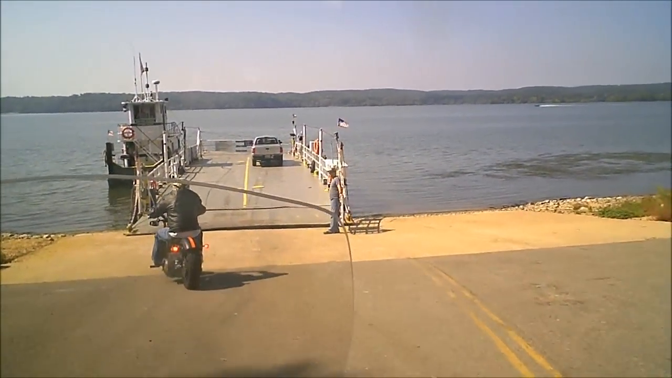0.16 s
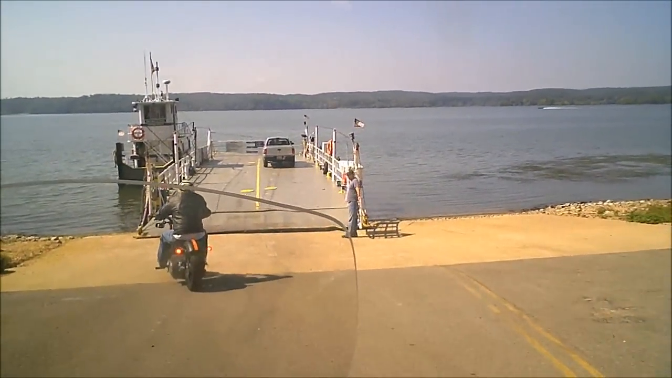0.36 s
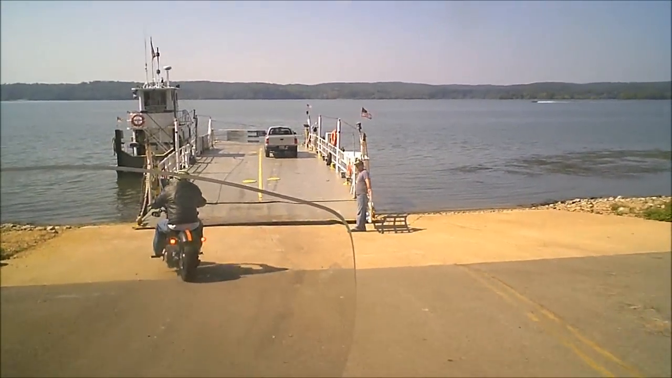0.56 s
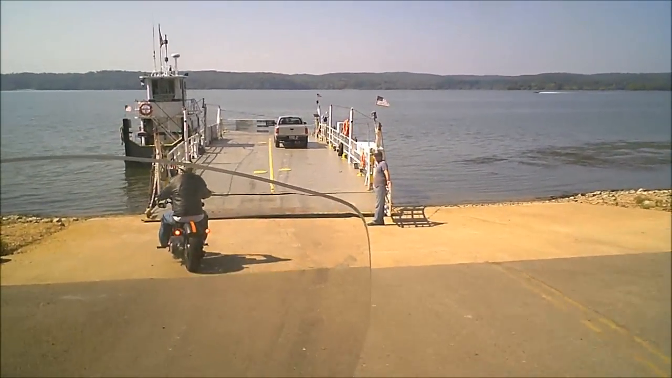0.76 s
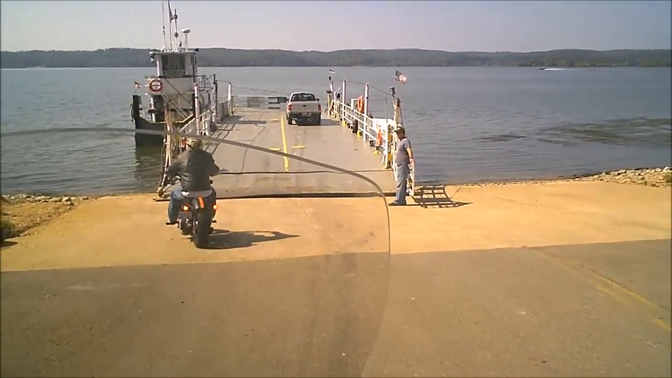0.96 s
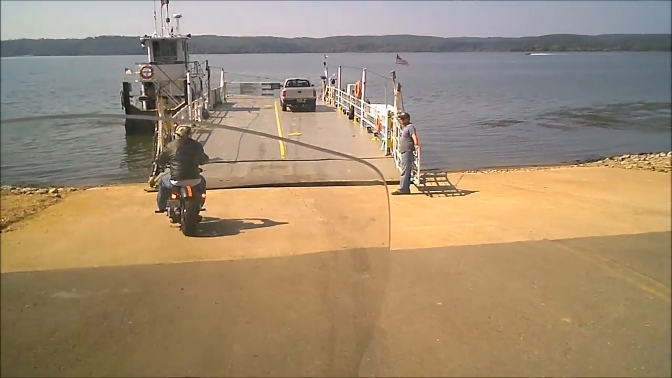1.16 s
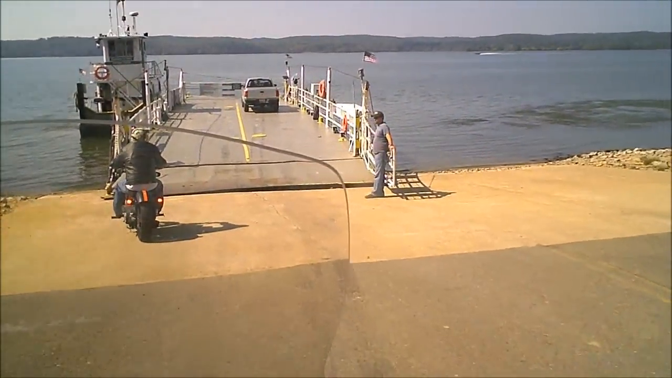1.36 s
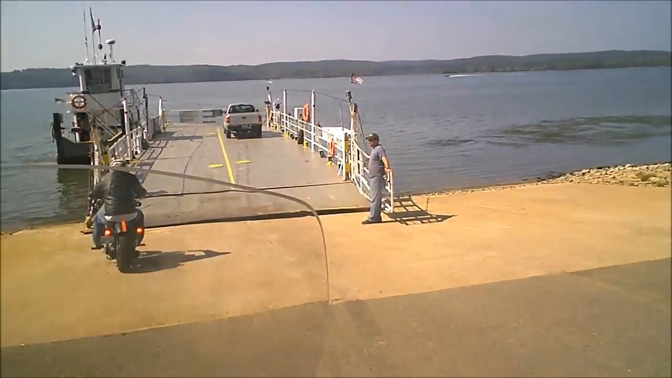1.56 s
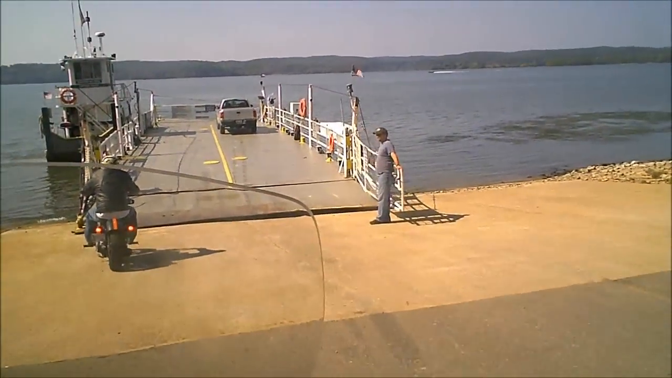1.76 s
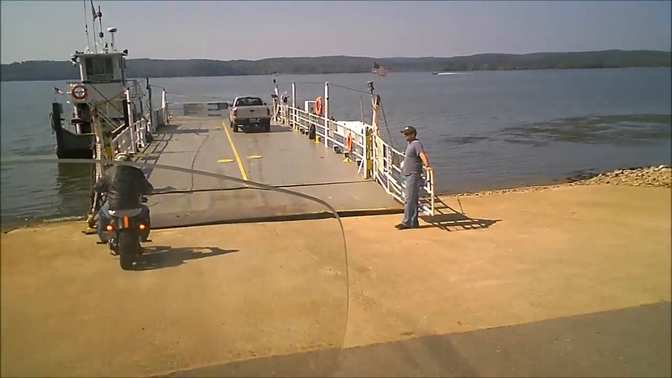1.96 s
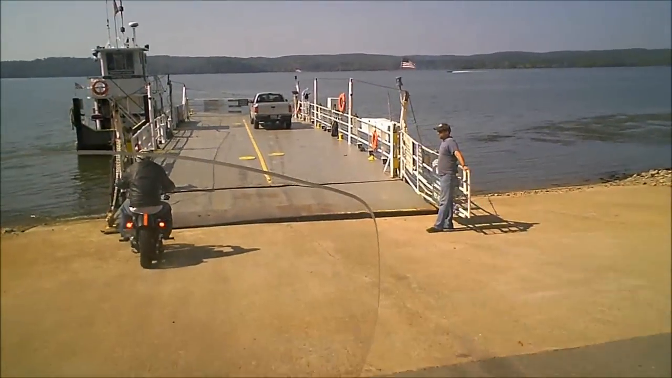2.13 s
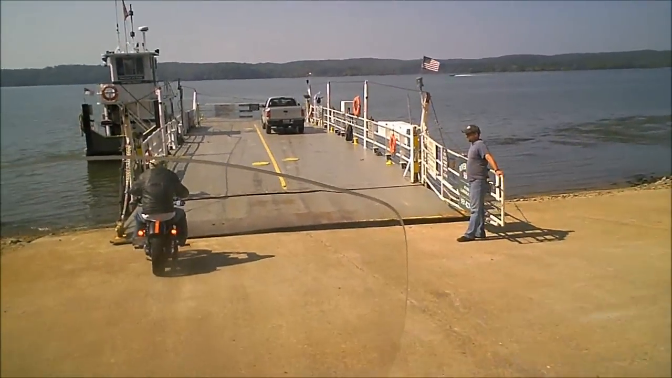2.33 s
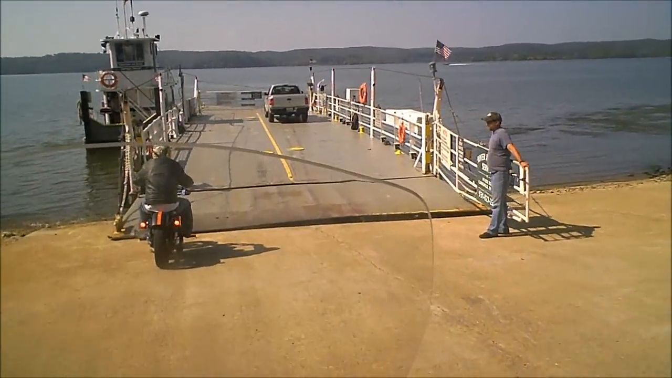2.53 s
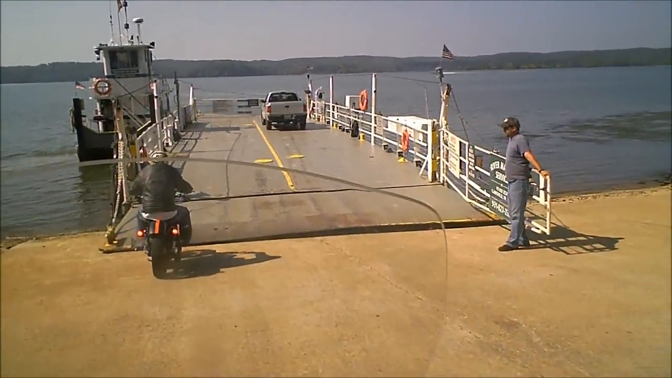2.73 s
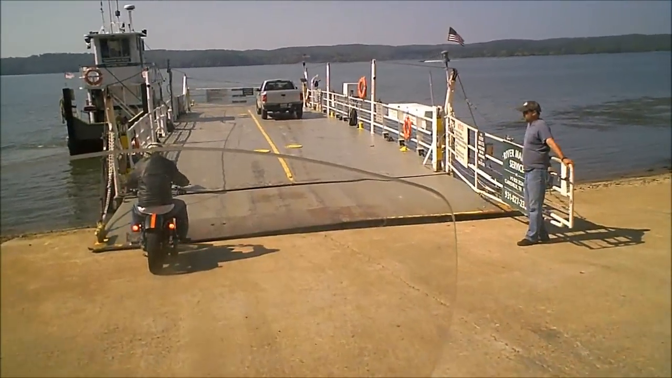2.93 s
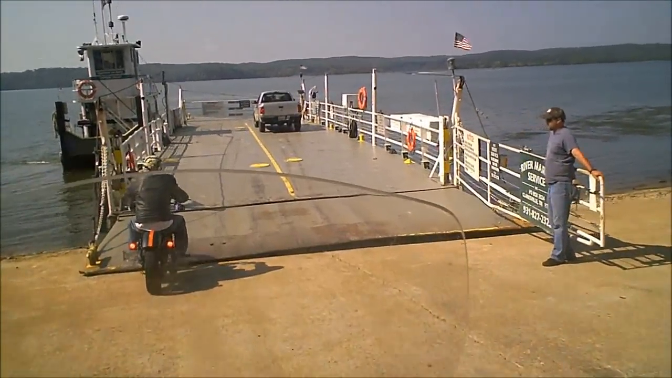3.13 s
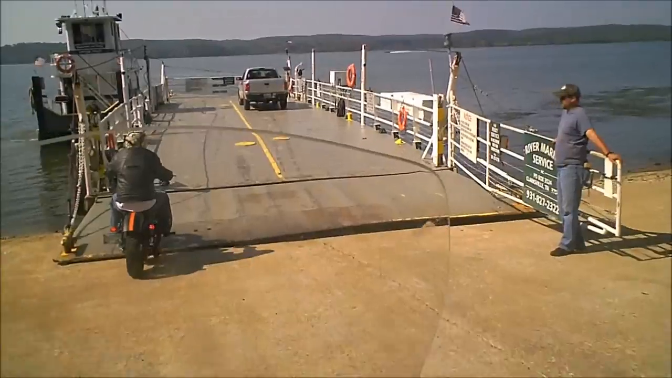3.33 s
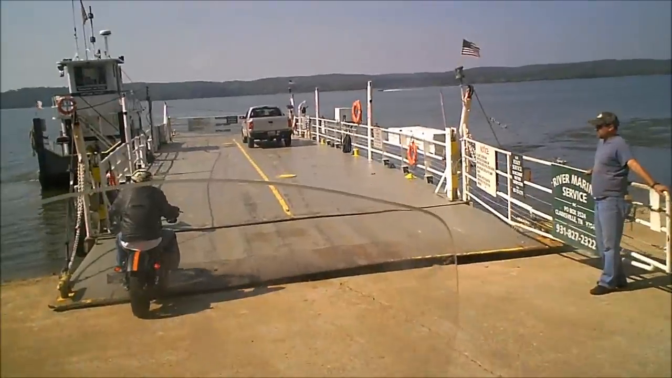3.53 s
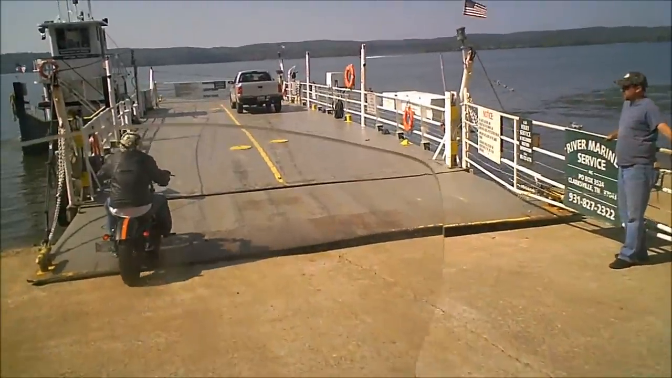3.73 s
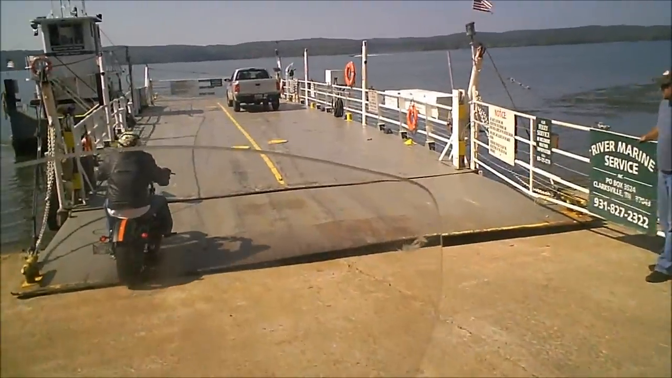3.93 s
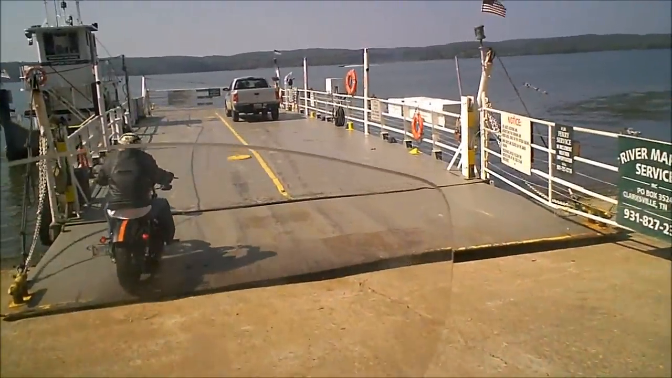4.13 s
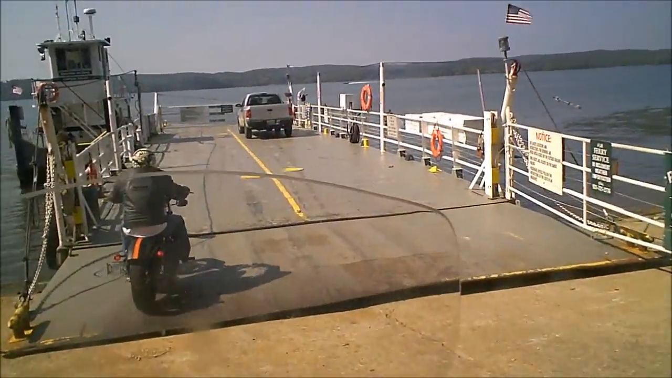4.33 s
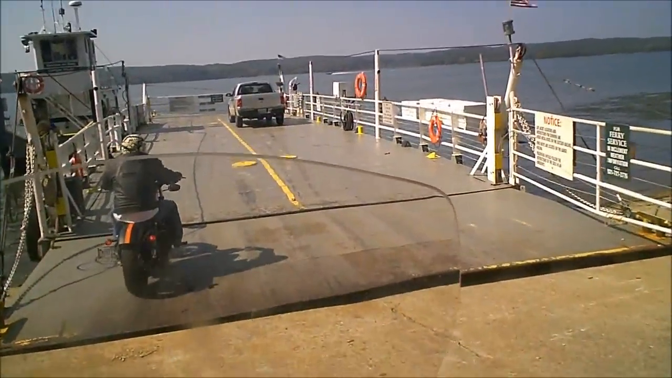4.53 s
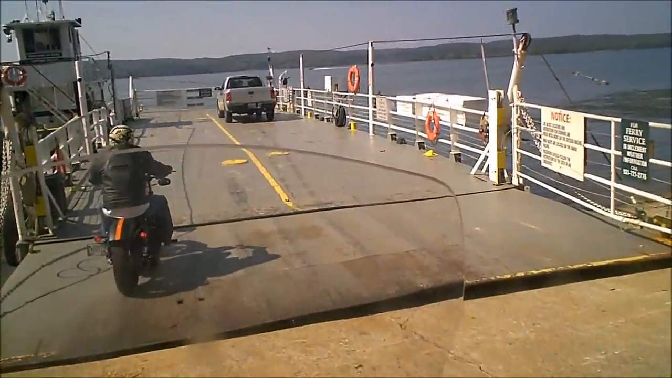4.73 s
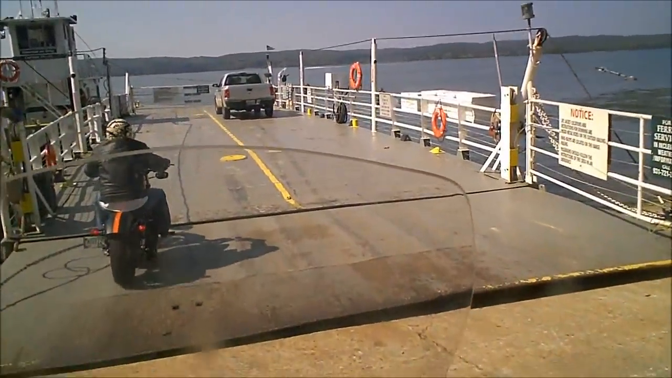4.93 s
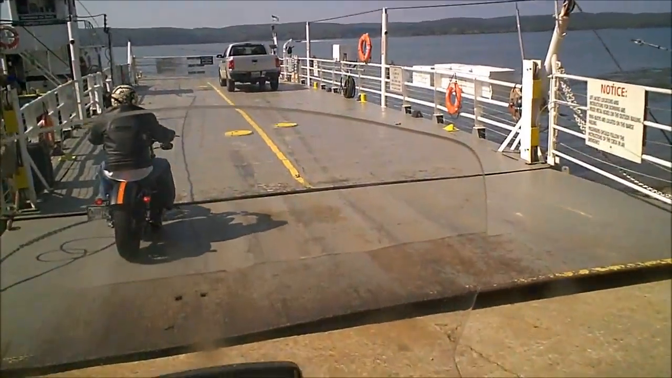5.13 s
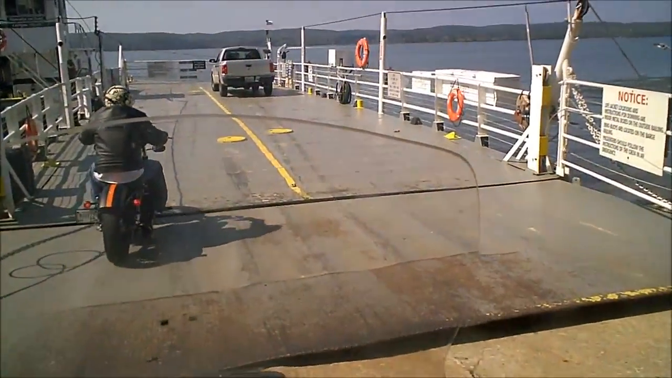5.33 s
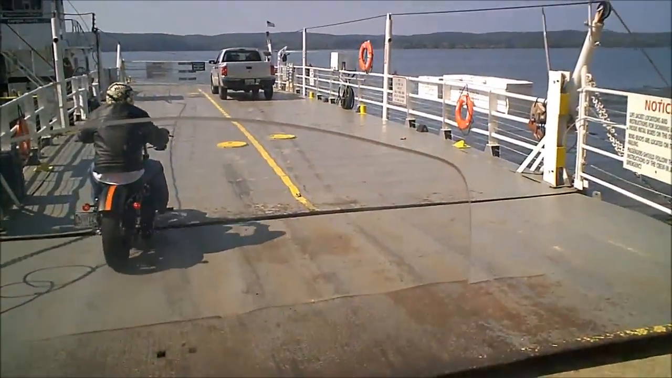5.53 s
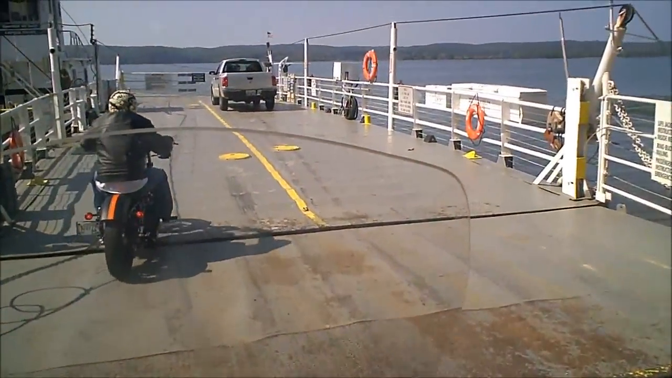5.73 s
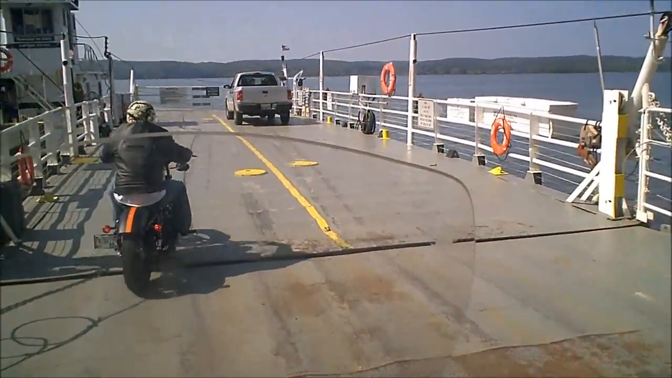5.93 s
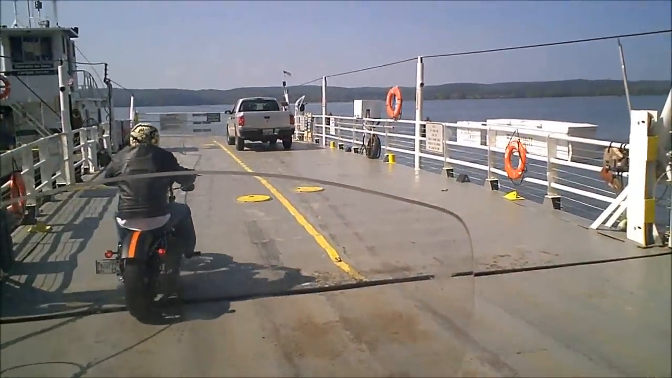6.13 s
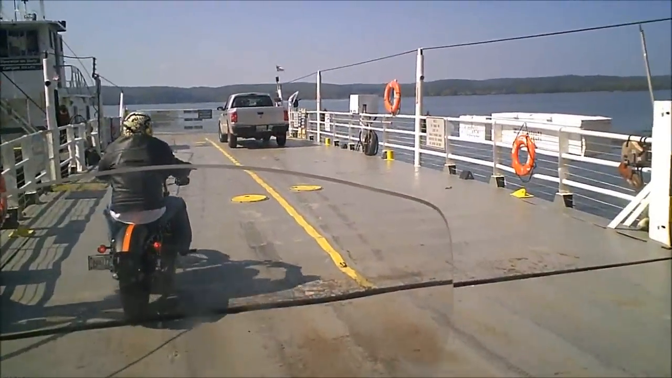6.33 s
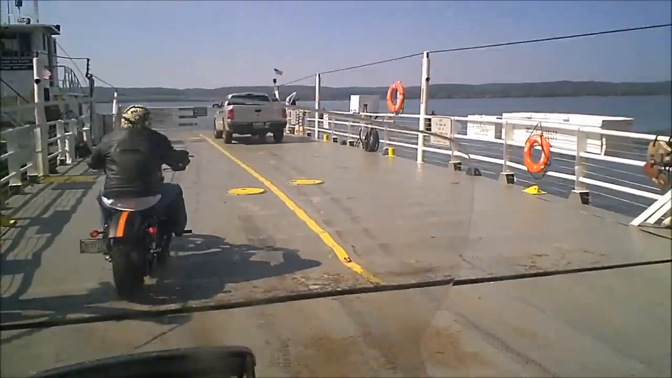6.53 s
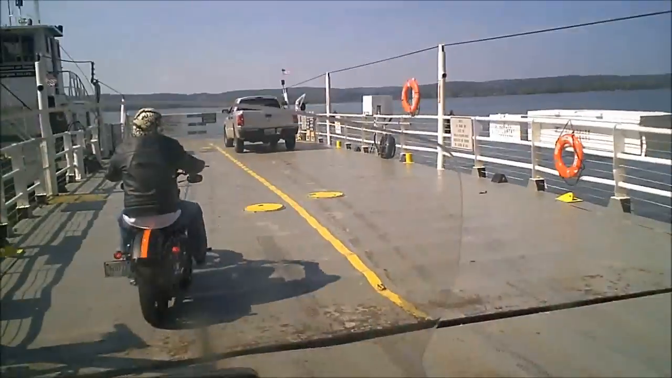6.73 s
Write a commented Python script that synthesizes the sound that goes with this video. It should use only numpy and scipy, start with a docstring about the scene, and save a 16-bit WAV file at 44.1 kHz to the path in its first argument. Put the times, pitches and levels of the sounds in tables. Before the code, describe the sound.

Two motorcycles rumble slowly onto a steel ferry deck, one barking with short throttle blips, with an engine clatter and a ramp clank.

```python
"""A V-twin motorcycle lopes along and barks at four touches of the throttle, louder as it speeds up.
Each firing rings the exhaust pipes; an open throttle adds a crack of shocks. It is heard from a second,
slower-running twin, whose valve gear clatters over a low drone. Both roll down a concrete landing onto
a steel ferry deck: tyres rush, the ramp clanks under the wheels, something ticks sharply near the end."""
import sys
import numpy as np
from scipy import signal
from scipy.fft import rfft, irfft, next_fast_len
from scipy.io import wavfile
from scipy.ndimage import uniform_filter1d, map_coordinates

SR = 44100
rng = np.random.default_rng(int(sys.argv[2]) if len(sys.argv) > 2 else 0)


def log_audio(samples):
    """Write samples as a 16-bit WAV file to the path given in sys.argv[1]."""
    # one column per channel
    frames = np.atleast_2d(samples).T
    # limit to full scale, then quantise
    limited = np.clip(frames, -1, 1)
    pcm = np.round(limited * 32767).astype(np.int16)
    wavfile.write(sys.argv[1], SR, pcm)


N = 298998


def amp(db):
    """Decibels to gain."""
    return 10 ** (np.asarray(db) / 20)


def unit(x):
    """Scale to rms 1."""
    return x / np.sqrt(np.mean(x ** 2) + 1e-20)


def curve(rows):
    """(time, value) rows to one value per sample."""
    return np.interp(np.arange(N) / SR, *np.transpose(rows))


def at(times_s, values):
    """Per-sample values read at these times."""
    return np.interp(times_s, np.arange(N) / SR, values)


def wobble(rate_hz):
    """Smooth random curve, rate_hz knots a second."""
    knots = rng.standard_normal(int(N * rate_hz / SR) + 4)
    return map_coordinates(knots, [np.arange(N) * rate_hz / SR])


def colour(spectrum, hz):
    """Gain of (frequency, level) rows joined on a log axis."""
    knots_hz, db = np.transpose(spectrum)
    return amp(np.interp(np.log(hz + 1), np.log(knots_hz + 1), db))


def filtered(x, response):
    """x through a frequency response."""
    size = next_fast_len(N + SR // 2)
    return irfft(rfft(x, size) * response(np.fft.rfftfreq(size, 1 / SR)), size)[:N]


def noise(spectrum):
    """Coloured noise, rms 1."""
    return unit(filtered(rng.standard_normal(N), lambda hz: colour(spectrum, hz)))


def pulse(spectrum, size=4096):
    """Minimum-phase pulse with this spectrum, peak 1."""
    cepstrum = irfft(np.log(colour(spectrum, np.fft.rfftfreq(size, 1 / SR))))
    cepstrum[1:size // 2] *= 2
    cepstrum[size // 2 + 1:] = 0
    shape = irfft(np.exp(rfft(cepstrum)))[:size // 2]
    return shape / np.abs(shape).max()


def strikes(times_s, gains):
    """Single-sample blows."""
    return np.bincount(np.clip(np.round(times_s * SR).astype(int), 0, N), gains, N + 1)[:N]


def through(x, response):
    """x convolved with an impulse response."""
    return signal.fftconvolve(x, response)[:N]


def shaft_times(speed, shares):
    """Times at which an engine passes these shares of its cycle."""
    cycles = np.cumsum(curve(speed)) / SR
    marks = (np.arange(int(cycles[-1]) + 1)[:, None] + np.array(shares)).ravel()
    return np.interp(marks[marks < cycles[-1]], cycles, np.arange(N) / SR)


# rolling noise (frequency [Hz], level [dB])
TYRE_SPECTRUM = [(25, -27), (55, -32), (105, 9), (145, 1.5), (300, -8), (560, 5), (740, -8), (950, -1.5),
                 (1200, -7.5), (2200, -27.5), (3500, -43), (5000, -44)]
def tyres(level_db=-49, follow=0.33, uneven_db=1.5):
    """Rubber rolls over concrete and steel, growing with the engines."""
    rush = noise(TYRE_SPECTRUM)
    engine_db = curve(ENGINE_LEVEL)
    return amp(level_db + follow * (engine_db - engine_db.mean()) + uneven_db * wobble(24)) * rush


# faint clicks (time [s], level [dB])
CLICKS = [(.981, -62), (2.135, -57), (2.458, -56.5), (6.198, -50)]
def clicks(t60_s=.02):
    """Dry, bright clicks with no pitch."""
    t = np.arange(SR // 20) / SR
    times_s, db = np.transpose(CLICKS)
    burst = rng.standard_normal(len(t)) * amp(-60 * t / t60_s)
    return through(strikes(times_s, amp(db)), burst)


def fittings(level_db=-14, ring_hz=5900, t60_s=0.028, count=26):
    """Loose fittings jingle faintly, louder as the machine shakes harder."""
    t = np.arange(SR // 10) / SR
    envelope = amp(-60 * t / t60_s) * (1 - np.exp(-t / .001))
    out = np.zeros(N + len(t))
    for when, size, pitch in rng.uniform(0, 1, (count, 3)):
        ring = np.sin(2 * np.pi * ring_hz * (.8 + .4 * pitch) * t)
        out[int(when * N):][:len(t)] += size * envelope * ring
    return amp(curve(CLATTER_LEVEL) + level_db) * out[:N]


# sharp ticks (time [s], level [dB])
TICKS = [(4.653, -41), (6.584, -11)]
# their modes (frequency [Hz], level [dB], t60 [s])
TICK_MODES = [(3000, -8, 0.0051), (3930, 3.5, 0.0036), (5895, -3, 0.0014), (11820, -51, 0.0073)]
def ticks(attack_s=0.000051):
    """A small hard contact rings for milliseconds."""
    t = np.arange(SR // 20) / SR
    ring = sum(amp(db - 60 * t / t60_s) * np.sin(2 * np.pi * hz * t) for hz, db, t60_s in TICK_MODES)
    times_s, db = np.transpose(TICKS)
    return through(strikes(times_s, amp(db)), ring * (1 - np.exp(-t / attack_s)))


# broad resonances (frequency [Hz], level [dB])
METAL_SPECTRUM = [(200, -12), (600, -1.5), (760, -20), (1000, -15), (1350, -19), (1700, -3.5), (1950, -5.5),
                  (2150, -16.5), (2450, -12), (2800, -4), (2950, -6), (3150, 2), (3480, 1.5), (3700, -14)]
# narrow resonances (frequency [Hz], width [Hz], level [dB])
METAL_MODES = [(1571, 13, 0), (1872, 16, -.8), (2228, 18, -11), (2697, 22, -8), (3265, 123, -2.5),
               (3310, 57, 1)]
def rattle(drive, ring_db, edge_hz=3520):
    """The near machine's metal resonates, cut steeply above edge_hz."""
    edge = lambda hz: 1 / np.sqrt(1 + (hz / edge_hz) ** 110)
    modes = lambda hz: sum((-1) ** k * amp(db) * 1j * hz * width / (f0 ** 2 - hz ** 2 + 1j * hz * width)
                           for k, (f0, width, db) in enumerate(METAL_MODES))
    broad = filtered(drive, lambda hz: colour(METAL_SPECTRUM, hz) * edge(hz))
    ring = filtered(np.roll(drive, SR // 1000), lambda hz: modes(hz) * edge(hz))
    return broad + amp(ring_db) * ring


# steel plate (frequency [Hz], level [dB])
RAMP_SPECTRUM = [(150, -24), (500, -11.5), (900, 4), (1300, -6), (2100, -1), (2800, -17), (3500, -6),
                 (4200, -65), (15000, -67)]
# wheel jolts (time [s], level [dB], rise [s], t60 [s], machine's share [0-1], thud level [dB])
CLANKS = [(1.803, -41.5, 0.013, 0.6, 0.16, -40), (6.106, -20, 0.0056, 0.093, 0.99, -20),
          (6.132, -26, 0.0076, 0.052, 1, -28.5)]
def ramp_clanks(thud_hz=510, thud_t60_s=0.053):
    """The ramp plate thuds and chatters on its seat; close by, the jolt also rings the machine."""
    out = np.zeros(N)
    for start_s, db, rise_s, t60_s, share, thud_db in CLANKS:
        t = np.maximum(np.arange(N) / SR - start_s, 0)
        attack = np.minimum(t / rise_s, 1)
        decay_s = np.maximum(t - 2 * rise_s, 0)
        force = attack * amp(-60 * decay_s / t60_s)
        chatter = force * rng.standard_normal(N)
        plate = np.sqrt(1 - share) * unit(filtered(chatter, lambda hz: colour(RAMP_SPECTRUM, hz)))
        machine = np.sqrt(share) * unit(rattle(chatter, ring_db=7))
        out += amp(db) * np.sqrt(np.mean(force ** 2)) * (plate + machine)
        out += attack * amp(thud_db - 60 * decay_s / thud_t60_s) * np.sin(2 * np.pi * thud_hz * t)
    return out


def drone_hz(base_hz=84.45, pull_hz=5, wander_hz=2.8):
    """The drone's pitch wanders and rises with the throttle."""
    return base_hz + pull_hz * throttle() + wander_hz * wobble(3)


def drone(level_db=-57, follow=.85, throttle_db=7, octave_db=-13, waver_db=1.0):
    """The engines' low, wavering note swells under load."""
    phase = 2 * np.pi * np.cumsum(drone_hz()) / SR + 0.21 * wobble(10)
    engine_db = curve(ENGINE_LEVEL)
    db = level_db + follow * (engine_db - engine_db.mean())
    db += throttle_db * throttle() + waver_db * wobble(20)
    return amp(db) * unit(np.sin(phase) + amp(octave_db) * np.sin(2 * phase))


# near engine (time [s], speed [four-stroke cycles/s])
NEAR_SPEED = [(0, 9.7), (.55, 10.6), (.9, 10.06), (3.4, 9.43), (3.9, 14.1), (5.7, 12.5), (6.2, 8.77),
              (6.78, 11)]
# its clatter (time [s], relative level [dB])
CLATTER_LEVEL = [(0, -49.5), (1.05, -52), (1.9, -48), (2.95, -47.5), (3.5, -45), (3.75, -40), (4.45, -42.5),
                 (4.7, -44.5), (5.2, -39.5), (5.9, -39), (6.3, -41), (6.78, -42)]
def valve_gear(level_db=3.0, tap_t60_s=0.046, loud_db=3, spread_db=2.5, tap_gain=0.65, whirr_gain=0.32):
    """Four valve taps a cycle, one louder, over chain churn and the whirr of gear teeth."""
    times_s = shaft_times(NEAR_SPEED, [.1, .34, .59, .84])
    jitter, spread = rng.standard_normal((len(times_s), 2)).T
    loud_valve = np.arange(len(times_s)) % 4 == 2
    tap_db = loud_db * loud_valve + spread_db * np.clip(spread, -2, 1.5)
    taps = strikes(times_s + 0.0029 * jitter, amp(tap_db))
    t = np.arange(SR // 10) / SR
    envelope = amp(-60 * t / tap_t60_s) * (1 - np.exp(-t / 0.01))
    force = 1 + tap_gain * unit(through(taps, envelope))
    teeth = rng.standard_normal(512)  # the same uneven teeth come round every turn
    turns = np.cumsum(drone_hz() * (1 + .012 * wobble(14))) / SR
    whirr = np.interp(turns % 1, np.linspace(0, 1, len(teeth)), teeth)
    drive = force * (rng.standard_normal(N) + whirr_gain * unit(whirr))
    return amp(curve(CLATTER_LEVEL) + level_db) * unit(rattle(drive, ring_db=3))


def scattered(x, t60_s, count=4):
    """Diffuse reflections shift at constant total power as the machines move."""
    t = np.arange(SR // 3) / SR
    shares = np.array([wobble(12) for _ in range(count)])
    shares /= np.linalg.norm(shares, axis=0)
    tails = rng.standard_normal((count, len(t))) * amp(-60 * t / t60_s) * (1 - np.exp(-t / 0.019))
    return sum(through(x * share, tail / np.linalg.norm(tail)) for share, tail in zip(shares, tails))


# exhaust echoes off nearby surfaces (delay [s], gain [ratio])
ECHOES = [(.0052, 0.35), (.0078, 0.15), (0.0125, .36), (.0245, 0.091)]
def reflected(x, drift=0.094):
    """x plus first echoes, whose paths change as the machines roll."""
    n = np.arange(N)
    return x + sum(gain * np.interp(n - delay_s * SR * (1 + drift * wobble(3)), n, x, left=0)
                   for delay_s, gain in ECHOES)


# one exhaust beat (frequency [Hz], level [dB])
THUMP_SPECTRUM = [(25, -80), (50, -62.5), (75, -17), (130, -16), (180, -11), (240, -2.5), (305, -1.5),
                  (400, -1.5), (480, -4), (570, -20.5), (700, -39.5), (1400, -31), (4000, -82.5)]
def thumps(times_s, db, tilt_spread=0.23):
    """Each firing rings the pipes' low and high resonance in new shares."""
    tilt = np.clip(tilt_spread * rng.standard_normal(len(times_s)), -.9, .9)
    blows = strikes(times_s, amp(db))
    blows += filtered(strikes(times_s, amp(db) * tilt), lambda hz: np.tanh((hz - 320) / 80))
    # all-pass: the pipes hold their own pitches longest, rounding each beat
    poles = lambda hz: (240 ** 2 - hz ** 2 + 200j * hz) * (410 ** 2 - hz ** 2 + 260j * hz)
    rounded = filtered(blows, lambda hz: np.conj(poles(hz)) / poles(hz))
    return through(rounded, pulse(THUMP_SPECTRUM))


IDLE_HZ, CYLINDER_LAG = 15.32, .43  # four-stroke cycle rate; share of a cycle between cylinders
# light running, growing toward the deck (time [s], relative level [dB])
ENGINE_LEVEL = [(0, -42), (.9, -37), (1.5, -38.5), (2, -35), (3.45, -33), (3.9, -29), (4.65, -28.5),
                (5.3, -24.5), (6.25, -27), (6.78, -27)]
def lope(lead_strong_db=8, near_strong_db=7, weak_db=3, near_follow=0.69, throttle_db=3, wet_db=0.5):
    """Both twins run light: a strong and a weak firing each cycle, half lost in reflections."""
    engine_db = curve(ENGINE_LEVEL)
    lead_db = engine_db + throttle_db * throttle()
    near_db = engine_db[0] + near_follow * (engine_db - engine_db[0])
    cylinders = [(shaft_times(lead_speed(), [.47]), lead_db + lead_strong_db),
                 (shaft_times(lead_speed(), [.47 + CYLINDER_LAG]), lead_db + weak_db),
                 (shaft_times(NEAR_SPEED, [.25]), near_db + near_strong_db),
                 (shaft_times(NEAR_SPEED, [.25 + CYLINDER_LAG]), near_db + weak_db)]
    times_s = np.concatenate([when_s for when_s, _ in cylinders])
    db = np.concatenate([at(when_s, level_db) for when_s, level_db in cylinders])
    jitter, spread_db = rng.standard_normal((len(times_s), 2)).T
    db += np.clip(spread_db, -2, 1.5)
    # a bark replaces the soft firings next to it
    free = np.abs(times_s[:, None] - hard_firings()[:, 0]).min(axis=1) > .012
    direct = thumps((times_s + 0.003025 * jitter)[free], db[free])
    return reflected(direct) + amp(wet_db) * scattered(direct, t60_s=0.15)


# hard firing, under throttle or running down (time [s], length [s], cycle rate [Hz], slope [Hz/s],
# throttle [0-1], opening time [s], level at idle speed [dB], second cylinder offset [dB])
REVS = [(3.696, .243, 11.48, 15, 0.96, 0.047, -9.5, 0.5),
        (4.785, .422, 10.89, 18.5, 0.99, .045, -10.5, 0.5), (5.315, .32, 17.1, -4, .15, 0.048, -13.5, -6),
        (5.679, .13, 15.85, 21.5, .95, 0.0101, -10, -.5), (6.426, .34, 14.36, -3, 1, 0.011, -7.5, 0.5)]
# stray firings, throttle shut (time [s], level [dB])
POPS = [(2.572, -16), (2.834, -18), (4.166, -17), (4.299, -15), (4.4, -19.5), (6.087, -12), (6.319, -11.5),
        (6.355, -14)]
def hard_firings(db_per_hz=1.18):
    """Rows (time [s], level [dB], cylinder [0/1]): rev firings, louder with speed, then stray pops."""
    rows = []
    cycle, cylinder = np.divmod(np.arange(24), 2)
    for start_s, length_s, rate_hz, slope, _, _, db, second_db in REVS:
        t = np.arange(int(length_s * SR)) / SR
        cycles = rate_hz * t + slope * t ** 2 / 2
        when_s = np.interp(cycle + CYLINDER_LAG * cylinder, cycles, t, right=np.nan)
        level_db = db + second_db * cylinder + db_per_hz * (rate_hz + slope * when_s - IDLE_HZ)
        rows.append(np.column_stack([start_s + when_s, level_db, cylinder])[np.isfinite(when_s)])
    return np.vstack(rows + [[(time_s, db, 0) for time_s, db in POPS]])


def throttle(ahead_s=.025, close_s=.04):
    """Opening 0-1: eases open just before each rev, snaps shut after it."""
    t = np.arange(N) / SR
    out = np.zeros(N)
    for start_s, length_s, _, _, opening, rise_s, *_ in REVS:
        rise = 1 - np.exp(-np.maximum(t - start_s + ahead_s, 0) / rise_s)
        fall = np.exp(-np.maximum(t - start_s - length_s, 0) / close_s)
        out += opening * rise * fall
    return out


def lead_speed(lug_s=.25):
    """Rows (time [s], cycle rate [Hz]): the V-twin rolls steadily, lugs at the ramp, then revs."""
    speed = [(REVS[0][0] - lug_s, IDLE_HZ)]
    for start_s, length_s, rate_hz, slope, *_ in REVS:
        speed += [(start_s, rate_hz), (start_s + length_s, rate_hz + slope * length_s)]
    return speed


# one exhaust shock (frequency [Hz], level [dB])
CRACK_SPECTRUM = [(40, -71), (200, -12), (450, 12.5), (640, 1.5), (880, -2.5), (1150, -5), (1500, -7.5),
                  (2500, -18), (4000, -22.5), (6000, -33), (10000, -43), (16000, -60)]
def barks(thump_db=-1, open_db=-18.5, shut_db=-30.5, second_db=-4, follow=0.57, gap_s=0.00062, wet_db=-6):
    """Hard firings: the wider the throttle, the more the pressure front breaks into a crack of shocks."""
    times_s, db, cylinder = hard_firings().T
    shut = 1 - at(times_s, throttle())
    body = thumps(times_s - .0012, db + thump_db, tilt_spread=0.14)  # swells ahead of the crack
    chance = rng.standard_normal((len(times_s), 5))
    lags_s = np.cumsum(gap_s * (1 + .24 * chance[:, 1:]), axis=1) - gap_s
    shocks_s = times_s[:, None] + .002 + lags_s
    crack_db = open_db + shut_db * shut + second_db * cylinder + follow * (db - np.median(db))
    sizes = amp(crack_db + chance[:, 0])[:, None] * np.array([0.97, -0.87, 0.6, -0.25])
    cracks = through(strikes(shocks_s.ravel(), sizes.ravel()), pulse(CRACK_SPECTRUM))
    diffuse = scattered(body + .4 * cracks, t60_s=.11)
    return reflected(body + cracks) + amp(wet_db) * diffuse


def scene():
    """Engines, tyres, ramp and small contacts, mono."""
    engines = lope() + barks() + drone() + valve_gear()
    return (engines + tyres() + ramp_clanks() + ticks() + clicks() + fittings())[None]


# hiss (frequency [Hz], level [dB])
HISS_SPECTRUM = [(1000, -2), (3600, 8.5), (4600, 5), (5400, 1.5), (6500, 0.5), (8000, -2), (15500, -3)]
def record(dry, hiss_db=-16, bass_hz=52, top_hz=15830):
    """The small microphone loses deep bass; faint hiss rides on the sound's fast swings."""
    x = signal.sosfilt(signal.butter(4, bass_hz, "high", fs=SR, output="sos"), dry[0])
    slope = np.gradient(filtered(x, lambda hz: hz < 3700))
    swing = np.sqrt(np.abs(uniform_filter1d(slope ** 2, size=110)))
    hiss = amp(hiss_db) * swing * noise(HISS_SPECTRUM)
    return filtered(x + hiss, lambda hz: hz < top_hz)[None]


dry = scene()
out = record(dry)
log_audio(out)
```